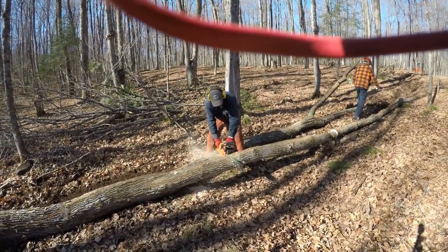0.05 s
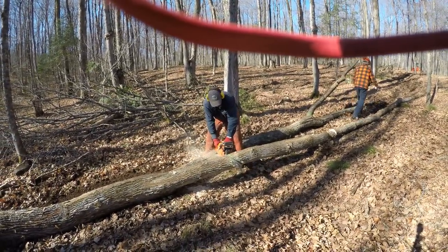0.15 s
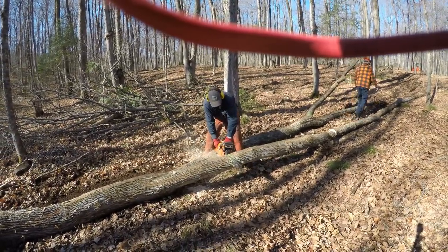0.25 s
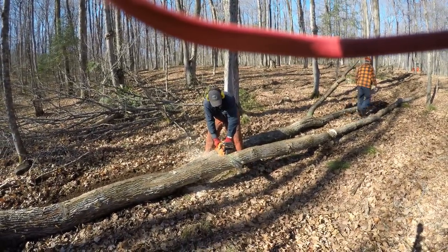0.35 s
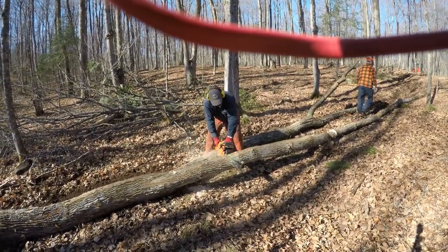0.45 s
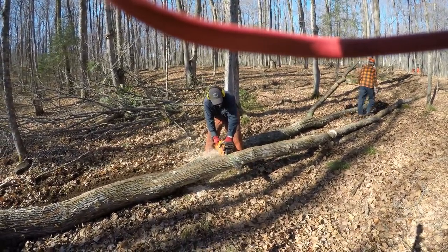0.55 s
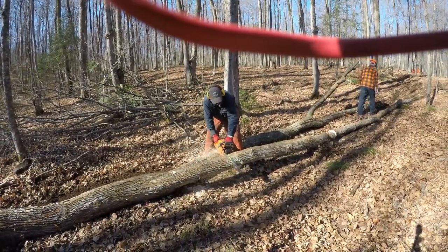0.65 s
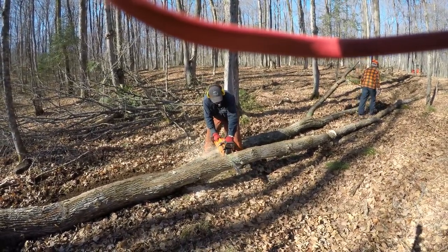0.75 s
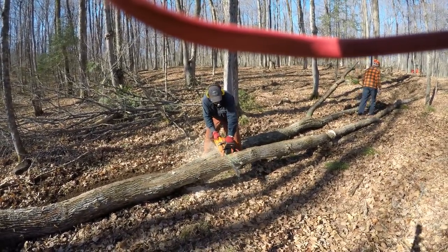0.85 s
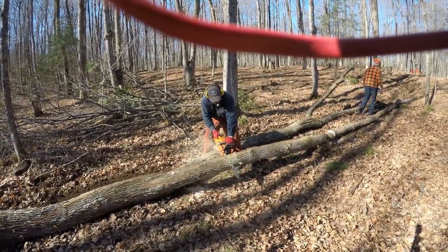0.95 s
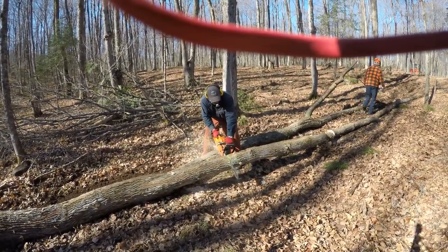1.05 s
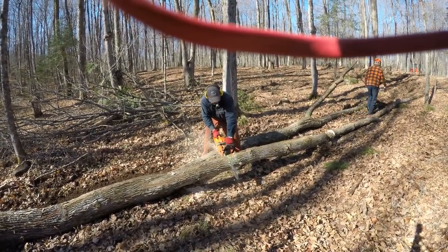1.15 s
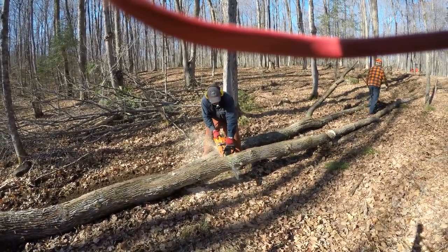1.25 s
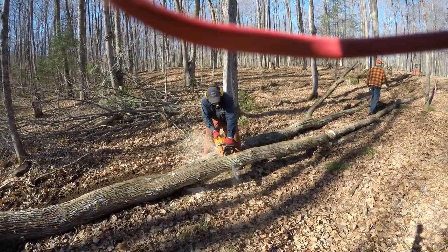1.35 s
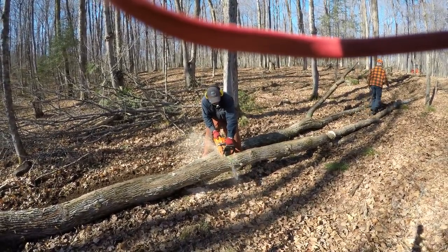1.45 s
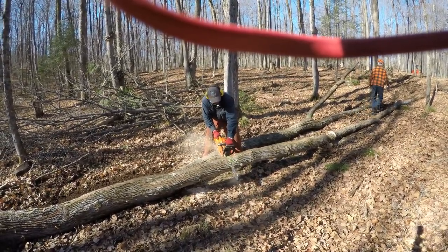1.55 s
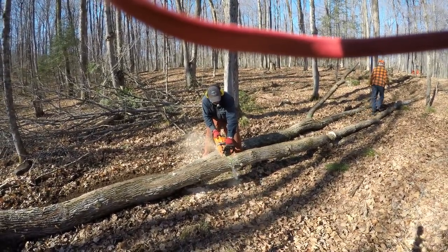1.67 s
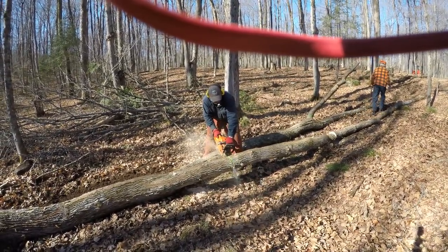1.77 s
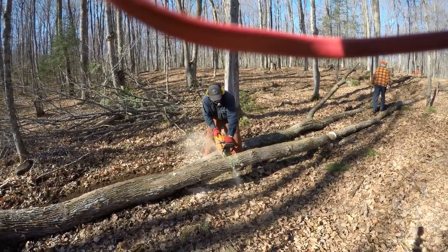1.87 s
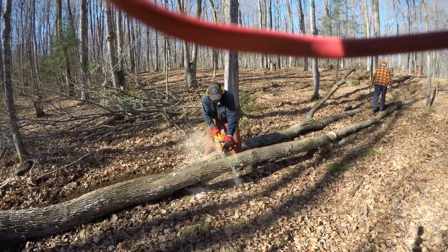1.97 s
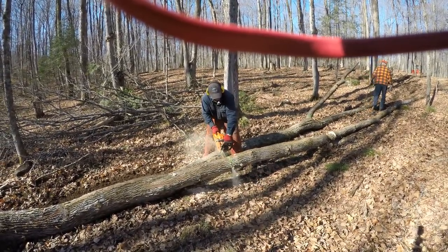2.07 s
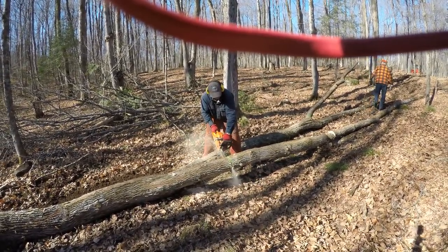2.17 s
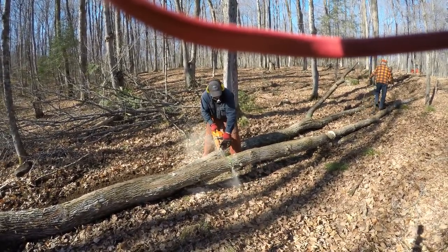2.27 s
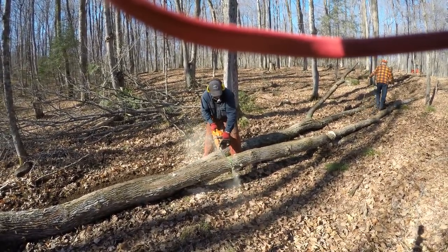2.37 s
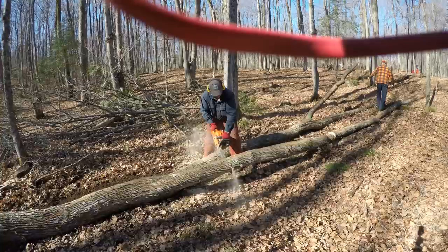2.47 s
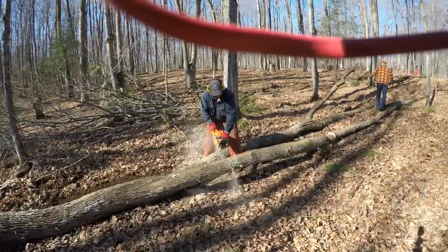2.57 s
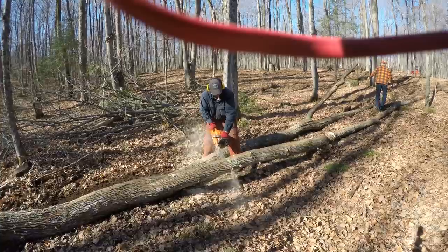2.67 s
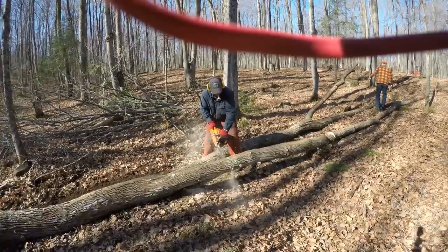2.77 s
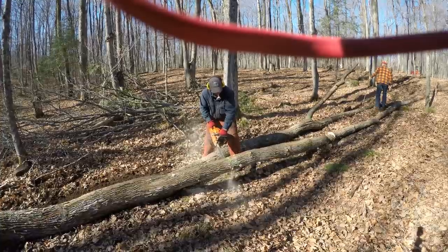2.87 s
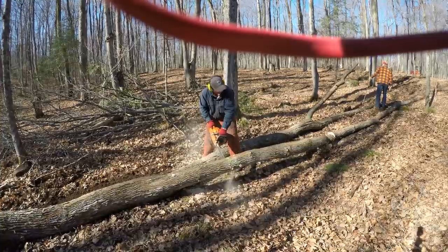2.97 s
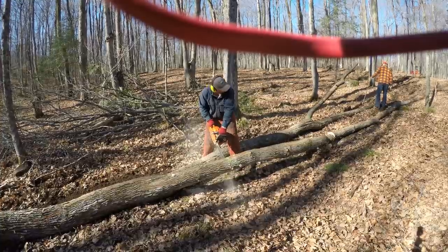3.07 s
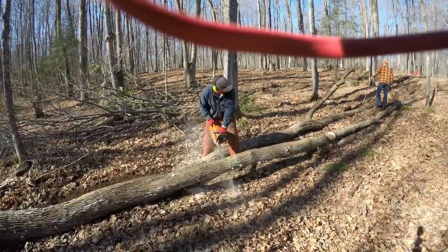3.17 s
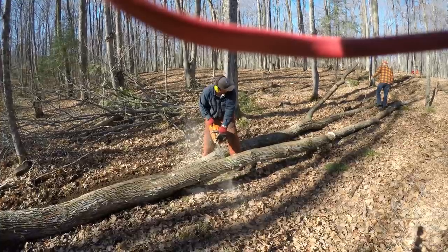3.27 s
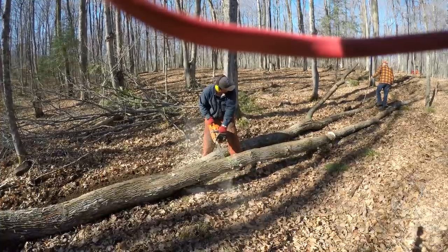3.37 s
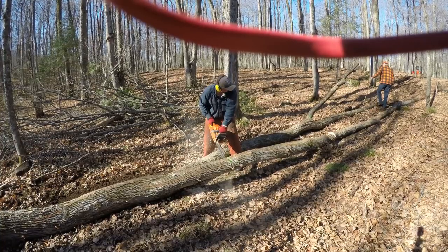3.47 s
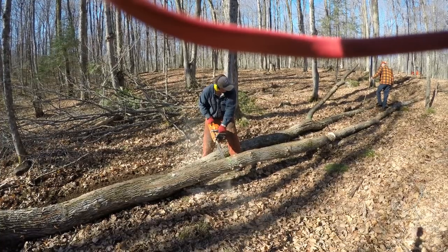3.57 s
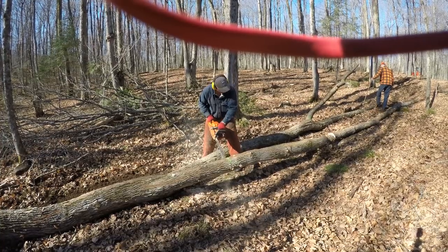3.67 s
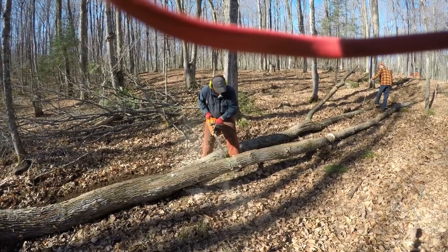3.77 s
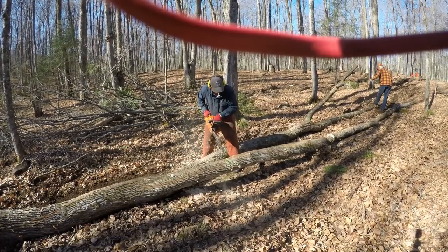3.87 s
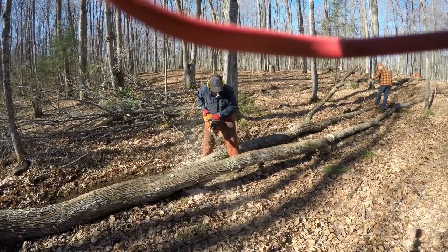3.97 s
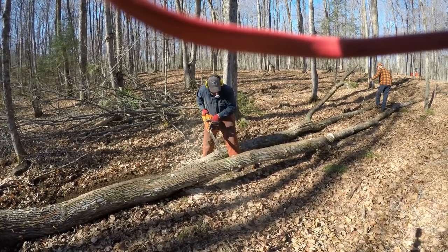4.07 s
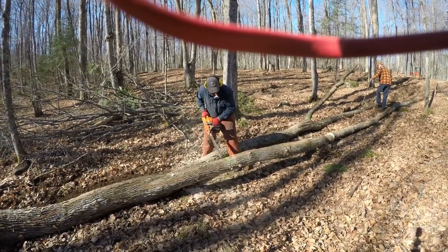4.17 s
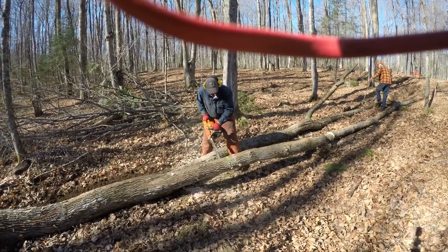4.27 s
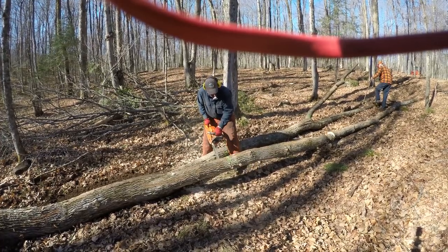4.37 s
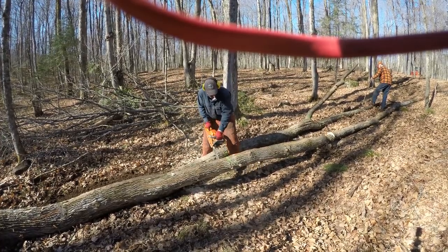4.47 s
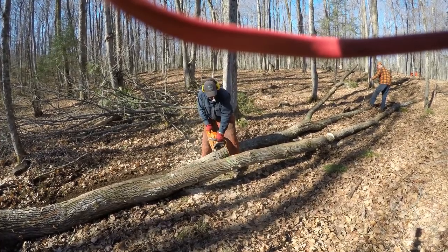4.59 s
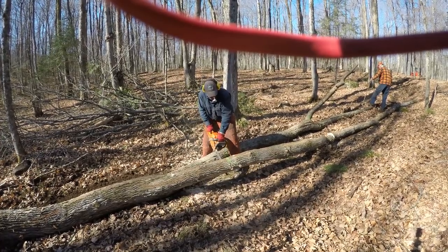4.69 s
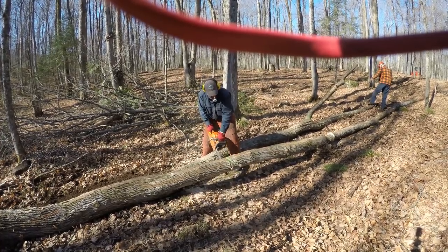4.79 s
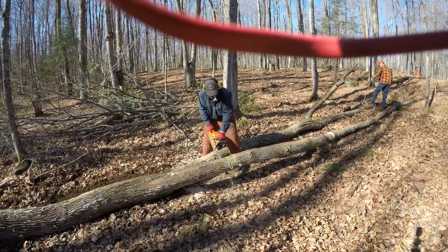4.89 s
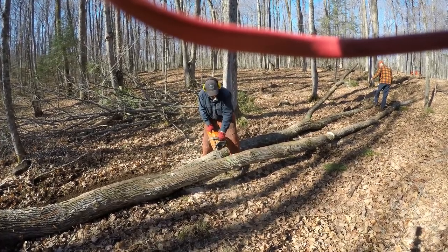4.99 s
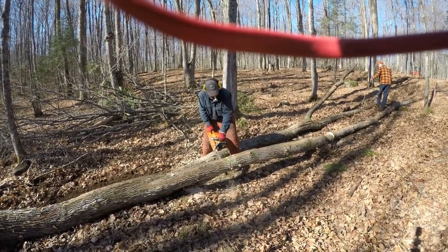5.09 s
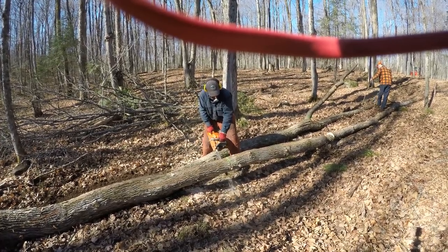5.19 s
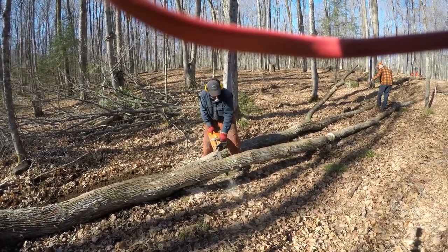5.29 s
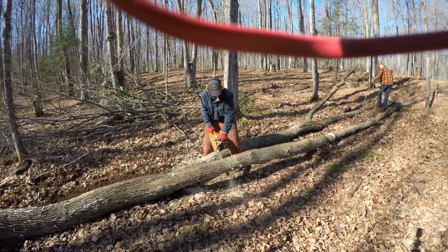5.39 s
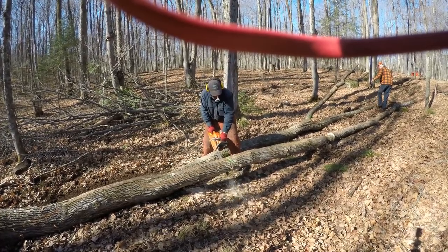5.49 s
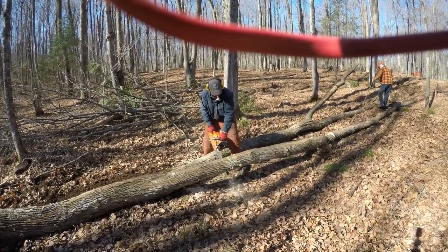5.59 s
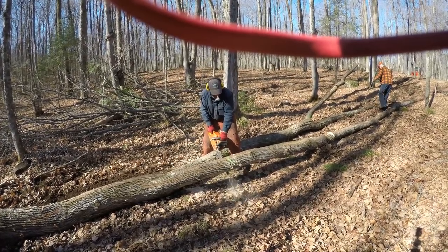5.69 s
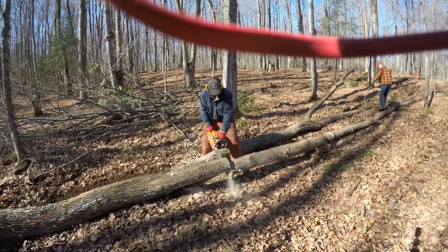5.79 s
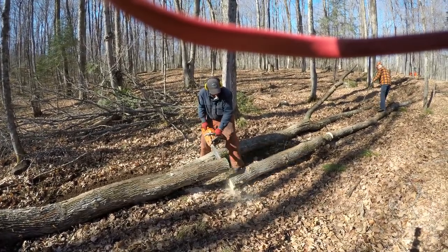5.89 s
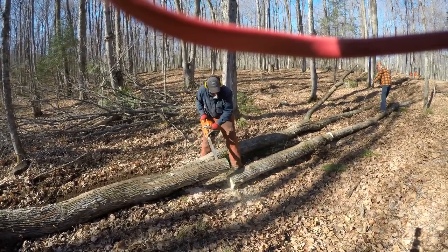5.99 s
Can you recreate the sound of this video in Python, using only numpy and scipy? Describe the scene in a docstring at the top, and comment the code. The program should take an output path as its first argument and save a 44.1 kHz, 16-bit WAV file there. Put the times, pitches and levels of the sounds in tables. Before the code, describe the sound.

A two-stroke chainsaw drones and rasps through a log under load, races as it breaks through, drops to a popping idle, then revs into another cut.

```python
"""Chainsaw cutting a log in a bare forest

A two-stroke saw sags under load, races as it breaks through, coasts to a popping idle, revs into a second cut.
Crank-locked orders make the exhaust drone; clicks and noise gated once a turn make engine and chain rasp.
The flywheel fan whines, resonators ring muffler, chain and bar, and decaying noise echoes come off the trunks.
Two microphone ports in one case hear it all."""
import sys
import numpy as np
from scipy import signal
from scipy.fft import rfft, irfft
from scipy.io import wavfile
from scipy.ndimage import uniform_filter1d

SR = 44100
rng = np.random.default_rng(int(sys.argv[2]) if len(sys.argv) > 2 else 0)


def transcribe(u):
    """Save the signal u as a 16-bit wav file named by the first command-line argument.

    u: samples, shape (n,) or (channels, n), limited to [-1, 1]; the rate is SR.
    q: integer samples, one column per channel.
    """
    v = np.clip(np.atleast_2d(u).T, -1, 1)
    q = np.round(v * 32767).astype(np.int16)
    wavfile.write(sys.argv[1], SR, q)


N = 266364
T = np.arange(N) / SR
FREQS = np.fft.rfftfreq(N, 1 / SR)
RACING_HZ = 208  # reference crank rate of rasp and whirr

# Colour of engine and chain noise. Each row: frequency in Hz, relative level in dB.
RASP_COLOUR = [(30, -7), (130, -1.5), (270, -6), (560, -10), (760, 1), (1130, -4.5), (1550, 3), (2100, -2),
               (2900, 1), (4350, 3.5), (5100, -2.5), (6750, 2), (8000, -6.5), (10300, -13), (13000, -27),
               (14800, -44)]
# Dull roar of gas through the muffler's outlet. Each row: frequency in Hz, relative level in dB.
ROAR_COLOUR = [(150, -18), (270, 8), (380, -3), (480, 3), (720, 2.5), (1000, 2), (1300, -12), (2500, -32),
               (7000, -58)]
# Ring of chain and bar. Each row: frequency in Hz, width in Hz, relative level in dB.
METAL_MODES = [(1796, 99, 8.5), (2632, 136, 3), (3700, 160, 2.5), (4564, 290, -1.5), (6300, 280, -7)]


def undb(db):
    """Decibels to gain."""
    return 10 ** (np.asarray(db) / 20)


def unit(x):
    """Scale to rms 1."""
    return x / np.sqrt(np.mean(x ** 2))


def lookup(table, hz):
    """The columns of a frequency table, read on a log axis."""
    points, *columns = np.transpose(table)
    return [np.interp(np.log(hz + 1), np.log(points), c) for c in columns]


def colour(x, table):
    """Filter by a (Hz, dB) spectrum."""
    return irfft(rfft(x) * undb(lookup(table, FREQS)[0]), N)


def ring(x, modes):
    """Sum of damped resonances (Hz, width Hz, dB)."""
    response = 0
    for f, width, db in modes:
        damping = 1j * FREQS * width
        response = response + undb(db) * damping / (f ** 2 - FREQS ** 2 + damping)
    return irfft(rfft(x) * response, N)


def walk(rate_hz):
    """Random levels held 1 / rate_hz s and slewed twice; spread near 1."""
    k = int(SR / rate_hz)
    steps = np.repeat(rng.standard_normal(N // k + 1), k)
    return 1.317 * uniform_filter1d(uniform_filter1d(steps, k), k)[:N]


def spell(start_s, end_s, attack_s, release_s):
    """Rise, hold and fall between two times, 0-1."""
    return np.clip(np.minimum((T - start_s) / attack_s, (end_s - T) / release_s), 0, 1)


def strokes(turns, scatter_db):
    """One click of uneven size on each turn, placed between samples by a short sinc."""
    at = np.interp(np.arange(1, int(turns[-1])), turns, np.arange(N))
    size = undb(scatter_db * rng.standard_normal(len(at)))
    taps = at.astype(int)[:, None] + np.arange(-4, 6)
    clicks = np.zeros(N)
    np.add.at(clicks, np.clip(taps, 0, N - 1), size[:, None] * np.sinc(taps - at[:, None]))
    return clicks


def bursts(events, decay_s):
    """Short puffs of noise at (s, dB)."""
    shape = np.zeros(N)
    age = T[:4000]
    attack = 1 - np.exp(-age / .0005)
    for s, db in events:
        shape[int(s * SR):][:len(age)] += undb(db) * attack * np.exp(-age / decay_s)
    return shape * rng.standard_normal(N)


def thump(start_s, db, hz, rise_s):
    """A swing of pressure that swells to its peak at rise_s, then dies away."""
    age = np.maximum(T - start_s, 0)
    envelope = age / rise_s * np.exp(1 - np.minimum(age / rise_s, 20))
    return undb(db) * np.sin(2 * np.pi * hz * age) * envelope


def disperse(x, spread_s, count=100):
    """Every pitch arrives with its own small delay; the spectrum is kept."""
    delay_s = spread_s * np.interp(FREQS, np.linspace(0, SR / 2, count), rng.random(count))
    return irfft(rfft(x) * np.exp(-2j * np.pi * np.cumsum(delay_s) * SR / N), N)


def crank_rate():
    """Nominal engine speed in Hz: sags in the wood, races, coasts to idle, climbs and is snagged."""
    # Each row: time in seconds, crank rate in Hz.
    speed = [(0.0, 184.8), (0.34, 180.4), (0.46, 186.7), (0.86, 178.5), (1.26, 162.5), (1.93, 179.9),
             (2.09, 174.2), (2.36, 188.3), (2.61, 195.1), (2.96, 210.1), (3.18, 152.7), (3.45, 96.35),
             (3.59, 72.6), (3.88, 51.54), (4.17, 42.45), (4.49, 41.5), (4.6, 76), (4.8, 121.1),
             (4.86, 125.7), (5.06, 154), (5.44, 184.5), (5.62, 193.8), (5.75, 196.1), (5.8, 109.2),
             (5.89, 137.3), (6.04, 128)]
    s, hz = np.transpose(speed)
    return np.interp(T, s, hz)


def trigger(open_s=0.087, close_s=0.044):
    """Throttle opening, 0-1, ramped at each pull and release."""
    # Pulls, the first already held. Each row: start in seconds, end in seconds.
    pulls = [(-0.5, 2.985), (4.49, 5.91)]
    return sum(spell(start, end, open_s, close_s) for start, end in pulls)


def drone_level(hz, throttle, drone_db=-10, coast_db=-6, fade_db=-11, fade_from_hz=133, fade_range_hz=52):
    """Level of the fundamental in dB rms: steady under power, weak and fading on the overrun."""
    slow = np.clip((fade_from_hz - hz) / fade_range_hz, 0, 1)
    return drone_db + (1 - throttle) * (coast_db + fade_db * slow)


def exhaust(hz, turns, throttle, shut_db=-14, slow_db=-12, flutter_db=0.5, waver_db=2, count=11):
    """Clean crank orders: a strong fundamental, the rest shaped by the muffler and opened by the throttle."""
    # Muffler colour of orders 2 up. Each row: frequency in Hz, base level of a line in dB rms.
    muffler = [(120, -23), (300, -33), (495, -33.5), (555, -41.5), (620, -33), (830, -28.5), (950, -45),
               (1200, -54.5), (1550, -41), (1800, -52)]
    # Muffler resonances on orders 2-4. Each row: frequency in Hz, lift at full throttle in dB.
    swell = [(250, -11), (320, 3.5), (345, 2), (365, 7), (415, 11.5), (445, -6), (490, 1), (555, 2),
             (615, 3.5), (660, 9), (780, 8.5), (815, -1)]
    load_db, hollow_db, hollow_hz, hollow_width_hz = 1.94, -16, 360, 23
    # near idle most strokes do not fire, so the overtones fade
    unfired = np.clip((92 - hz) / 45, 0, 1)
    # the resonances only build up at working speed
    on_song = np.clip((hz - 134) / 22, 0, 1)
    # leaning hard on the bar hardens orders 2-4 and hollows the second near one pitch
    load = spell(start_s=0.15, end_s=2.28, attack_s=0.61, release_s=0.61)
    hollow = hollow_db * np.exp(-((2 * hz - hollow_hz) / hollow_width_hz) ** 2)
    out = undb(drone_level(hz, throttle)) * np.cos(2 * np.pi * turns)
    for k in range(2, count):
        db = lookup(muffler, k * hz)[0] + shut_db * (1 - throttle) * (1 - 1.71 / k) + slow_db * unfired
        if k <= 4:
            lift = throttle * on_song * lookup(swell, k * hz)[0]
            db = db + lift + flutter_db * walk(30) + load * load_db
        else:
            db = db + waver_db * walk(35)
        if k == 2:
            db = db + load * hollow
        # higher orders leave the muffler later: phase lag in rad
        out = out + undb(db) * np.cos(2 * np.pi * k * turns - 1.446 * (k - 1))
    return np.sqrt(2) * out


def labour(hz, turns, throttle, roar_db=-29, clears_hz=142, puff_turns=0.19):
    """With the throttle open at low speed each stroke is a rough blast; it clears as the engine climbs."""
    blasts = unit(colour(rng.standard_normal(N) * np.exp(-(turns % 1) / puff_turns), ROAR_COLOUR))
    return undb(roar_db) * throttle * np.clip((clears_hz - hz) / 60, 0, 1) * blasts


def four_stroking(turns, upper_db=-10, count=7):
    """Strong and weak firings alternate, which puts lines between the orders."""
    # Each row: start in seconds, end in seconds, level of the half order in dB rms.
    weak_spells = [(1.702, 2.618, -48), (2.627, 2.962, -31.5), (4.828, 5.011, -22)]
    gain = sum(undb(db) * spell(start, end, 0.029, 0.035) for start, end, db in weak_spells)
    upper = 0
    for k in range(1, count):
        line = np.cos(2 * np.pi * (k + .5) * turns + walk(30))
        upper = upper + undb(2 * walk(30.4)) * line / np.sqrt(k)
    return np.sqrt(2) * gain * (np.cos(np.pi * turns) + undb(upper_db) * upper)


def idle(hz, turns, lumpy_db=-10, uneven_turns=0.024):
    """Unfired strokes pump air that rings the muffler's cavity, with a lumpy rush of gas; loudest at idle."""
    idle_hz, pump_db, pump_db_per_octave, pump_ends_hz = 41.2, -18.5, -15, 109
    gain = undb(pump_db + pump_db_per_octave * np.log2(hz / idle_hz)) * np.clip((pump_ends_hz - hz) / 30, 0, 1)
    clicks = strokes(turns - .25 + uneven_turns * walk(30), scatter_db=2.5)
    gas = rng.standard_normal(N) * np.exp(-(turns % 1) / 0.63)
    push = unit(clicks) + undb(lumpy_db) * unit(gas)
    cavity = ring(push, [(166.94, 48, -1), (313.8, 49, -6.5)])
    cavity = ring(cavity, [(165.5, 62, 0), (320, 82, -21.0)])
    # level is set over the slow stretch
    slow = gain > gain.max() / 4
    return gain * cavity / cavity[slow].std()


def pops(thump_hz=110, thump_s=0.0038, crack_s=0.0041, gas_db=-3, shell_db=6, roar_db=3):
    """A lone firing: one swing of pressure, with a crack and roar of gas that rings the muffler shell."""
    # Each row: time in seconds, relative crack level in dB, thump level in dB.
    firings = [(3.878, -22.5, -12), (3.976, -14.5, -9.5), (4.083, -25, -11), (4.174, -17.5, -8),
               (4.262, -27, -10), (4.339, -23, -11), (4.388, -15, -7.5), (4.46, -15, -6),
               (4.484, -15, -7.5), (4.504, -10, -8.5), (4.54, -8, -7), (4.572, -7, -8), (5.914, -13.5, -7),
               (5.941, -12, -20.5)]
    # Ring of the muffler shell. Each row: frequency in Hz, width in Hz, relative level in dB.
    shell_modes = [(670, 110, 9.5), (3970, 210, -2)]
    low = sum(thump(s, db, thump_hz, thump_s) for s, _, db in firings)
    cracks = [row[:2] for row in firings]
    gas = colour(bursts(cracks, crack_s), RASP_COLOUR)
    roar = colour(bursts(cracks, crack_s), ROAR_COLOUR)
    return low + undb(gas_db) * gas + undb(shell_db) * ring(gas, shell_modes) + undb(roar_db) * roar


def rasp_level(hz, throttle, rasp_db=-18.5, bite_s=0.2, break_out_s=0.21):
    """Level of the rasp in dB: it grows with speed, and is muffled while the bar is buried in the log."""
    # Each row: start in seconds, end in seconds, level change in dB.
    cuts = [(-0.5, 2.655, -3), (5.0, 6.3, -1.26)]
    octaves = np.log2(hz / RACING_HZ)
    opened = 2.5 * octaves
    # with the throttle shut it falls ever faster
    shut = 3.5 * octaves - 1.72 * octaves ** 2
    buried = sum(db * spell(start, end, bite_s, break_out_s) for start, end, db in cuts)
    return rasp_db + throttle * opened + (1 - throttle) * shut + buried


def buzz(hz, turns, throttle):
    """Each stroke rattles through the housing: fine lines that glide with the engine."""
    housing = [(700, 2.0), (1150, 4.5), (1600, 6), (2300, 0.0), (4400, 1.5), (5200, -2), (6700, 1), (8000, -0.5)]
    lines = disperse(strokes(turns, scatter_db=1.6) / np.sqrt(hz), spread_s=.006)
    lines = colour(colour(lines, RASP_COLOUR), housing)
    return undb(-3.7) * (.85 + .15 * throttle) * unit(lines)


def hiss(hz, turns, throttle, hiss_db=-2.5, puff_db=6, dull_db=-6, jingle_db=5):
    """Gas and cutter teeth hiss; under throttle most just after the port opens."""
    # puffs stand apart at low speed and run together at high speed
    puff = undb(puff_db) * throttle * (130 / hz) ** 2 * np.exp(-(turns % 1) / 0.013)
    gate = (1 + puff) / np.sqrt(uniform_filter1d((1 + puff) ** 2, size=2000))
    noise = unit(colour(rng.standard_normal(N) * gate * undb(0.65 * walk(110)), RASP_COLOUR))
    # as the chain stops, a darker rush of air and a jingle of loose links are left
    running = np.clip((hz - 42) / 34, 0, 1)
    air = colour(noise, [(100, 22), (330, 17), (550, 15), (1000, 14.5), (1400, 8), (3800, 3.0),
                         (5500, 2), (11000, 0.5)])
    air = air + undb(jingle_db) * ring(noise, METAL_MODES)
    return undb(hiss_db) * (running * noise + undb(dull_db) * (1 - running) * air)


def fan(hz, turns, throttle, whine_db=-10.5, coasting_db=4.0, count=18):
    """The flywheel's blades whine unsteadily, plainest while coasting, and fall silent at low speed."""
    blade = 2 * np.pi * count * turns
    first = undb(-0.5 + 2.5 * walk(35)) * np.cos(blade + .55 * walk(60))
    second = undb(-3 + 2.5 * walk(40)) * np.cos(2 * blade + .75 * walk(80))
    # the starter cover colours the whine
    whine = colour(first + second, [(2000, -2), (3200, 0), (4500, 2), (4900, 1), (5400, -8), (6600, -1),
                                    (7000, -3), (7400, -14)])
    return undb(whine_db + coasting_db * (1 - throttle)) * np.clip((hz - 55) / 105, 0, 1) * whine


def whirr(hz, turns, waver_db=2, wander_rad=0.6):
    """Sprocket and links add a few wavering lines that glide with the engine."""
    # Orders that stand out of the rattle. Each row: crank order, relative level in dB.
    chain_orders = [(8, -17), (9, -16.5), (14, -19), (23, -16.5), (25, -15)]
    # How the bar passes them on. Each row: frequency in Hz, gain in dB.
    bar_colour = [(1400, 0.5), (1680, 2), (1850, -3), (2450, 2.5), (3600, -5), (4100, 2), (4550, 2.5),
                  (4850, -21)]
    lines = 0
    for k, db in chain_orders:
        line = np.cos(2 * np.pi * round(k) * turns + wander_rad * walk(50))
        lines = lines + undb(db + waver_db * walk(14)) * line
    return np.clip(hz / RACING_HZ, 0, 1) * np.sqrt(2) * colour(lines, bar_colour)


def chain(turns, knock_db=11, bar_hz=4200, bar_width_hz=130, count=15):
    """The slack chain knocks on the bar at idle, ever harder; running free, its links make the bar sing."""
    # Free running under power. Each row: start in seconds, end in seconds, relative level in dB.
    bar_ring = [(4.617, 5.139, -27), (5.773, 6.001, -28)]
    # about one blow a turn, at 41.7 Hz, growing 22 dB per s
    blows = [(4.095 + age, -31.5 + 22 * age) for age in np.arange(count) / 41.7]
    knocks = ring(colour(bursts(blows, decay_s=0.006), RASP_COLOUR), METAL_MODES)
    links = rng.standard_normal(N) * np.exp(-(turns % 1) / 0.74)
    singing = ring(ring(links, [(bar_hz, bar_width_hz, 0)]), [(bar_hz, 900, 0)])
    free = sum(undb(db) * spell(start, end, 0.06, 0.19) for start, end, db in bar_ring)
    return undb(knock_db) * knocks + free * unit(singing)


def falling_log():
    """The severed log drops onto the soil: one low swing of pressure."""
    return thump(start_s=5.862, db=-16, hz=34, rise_s=.02)


def ports(x, scattered):
    """Two ports in one case: alike in the bass, opposed at its resonance, unrelated in the treble."""
    # Case resonance. Each row: frequency in Hz, side minus mid in dB, side phase in rad.
    case = [(60, -15, 3.1), (180, -11.6, 2.45), (370, -3, 1.2), (500, 6, .45), (550, 10, -.7),
            (600, 5, -2.5), (720, -4.5, -3.1), (850, -5, -3.9), (1100, -16, -4.3), (2400, -13, -5.8),
            (4400, -14, -6.3), (5400, -9, -7.6), (6800, -12, -10), (9000, -12, -11)]
    # Hiss reaching each port by its own paths. Each row: frequency in Hz, gain in dB.
    scatter = [(4400, -15), (5000, -3), (6700, -4.5), (8500, 2.5), (14000, -1.5)]
    side_db, side_phase = lookup(case, FREQS)
    side = irfft(rfft(x) * undb(side_db) * np.exp(1j * side_phase), N) + colour(scattered, scatter)
    return np.array([x + side, x - side])


def smear(x, t60_s):
    """Many small echoes that die away; power is kept."""
    tail = rng.standard_normal(N) * undb(-60 * T / t60_s)
    return signal.fftconvolve(x, tail[:int(t60_s * SR)] / np.linalg.norm(tail))[:N]


def forest(x, forest_db=-13, t60_s=0.9):
    """The trunks send back coloured, decaying echoes, independent at each port."""
    # Each row: frequency in Hz, relative level in dB.
    trunks = [(180, -18), (400, -3), (1000, 1), (2400, 0), (4000, -5), (10000, -7)]
    returned = colour(x, trunks)
    return undb(forest_db) * np.array([smear(returned, t60_s) for _ in range(2)])


def scene():
    """The saw, heard directly and from the trees."""
    hz = crank_rate()
    throttle = trigger()
    turns = np.cumsum(hz * (1 + .001 * walk(45))) / SR
    engine = exhaust(hz, turns, throttle) + labour(hz, turns, throttle) + four_stroking(turns)
    engine = engine + idle(hz, turns) + pops()
    rasp_gain = undb(rasp_level(hz, throttle))
    rasp = buzz(hz, turns, throttle) * np.clip(hz / 100, 0, 1) + hiss(hz, turns, throttle)
    rasp = rasp + fan(hz, turns, throttle) + whirr(hz, turns)
    sound = engine + rasp_gain * rasp + chain(turns) + falling_log()
    return ports(sound, rasp_gain * hiss(hz, turns, throttle)) + forest(sound)


def record(dry, top_hz=14800):
    """A steep elliptic low-pass cuts the top."""
    return signal.sosfilt(signal.ellip(8, .2, 70, top_hz, fs=SR, output="sos"), dry)


dry = scene()
out = record(dry)
transcribe(out)
```